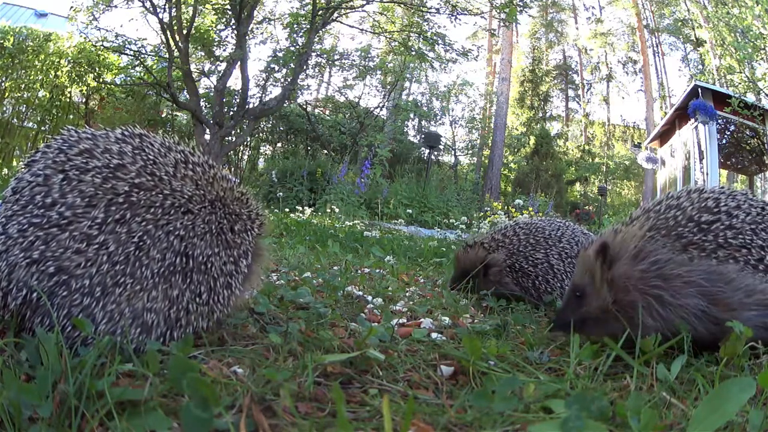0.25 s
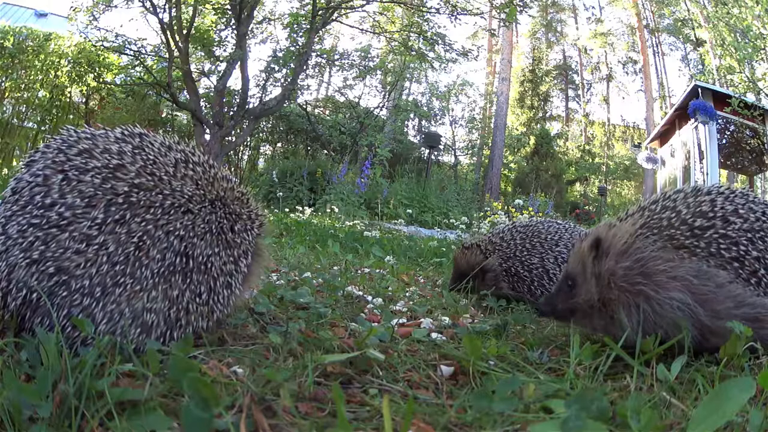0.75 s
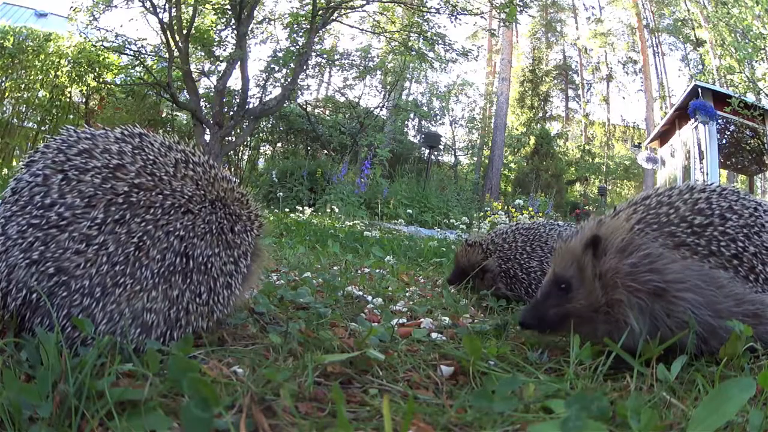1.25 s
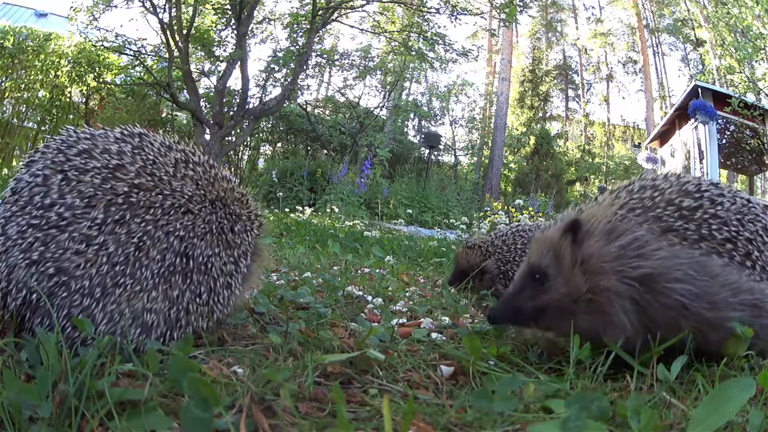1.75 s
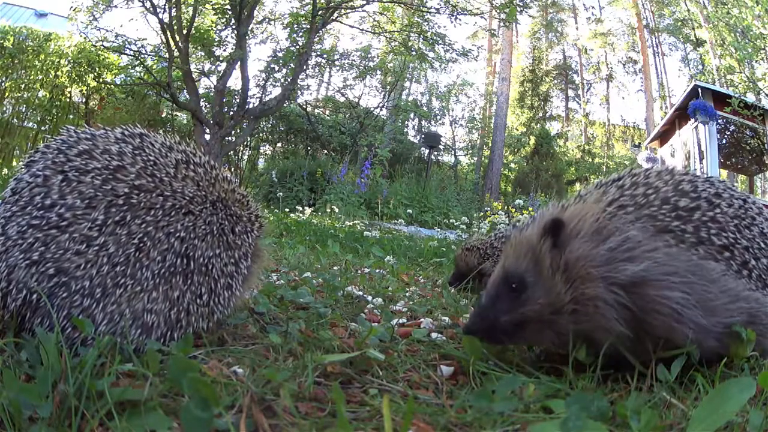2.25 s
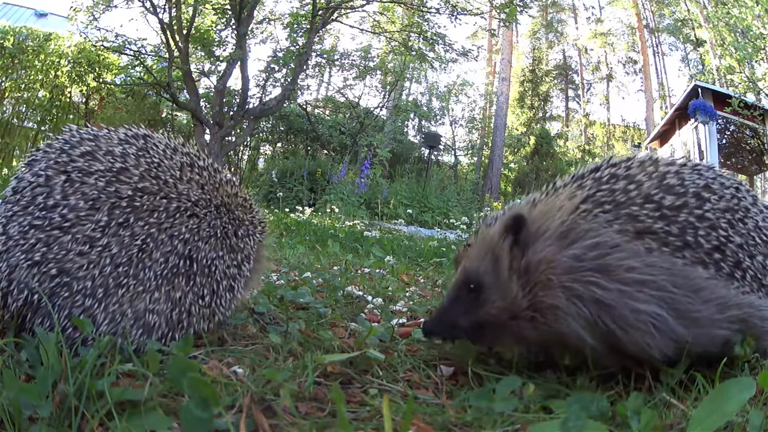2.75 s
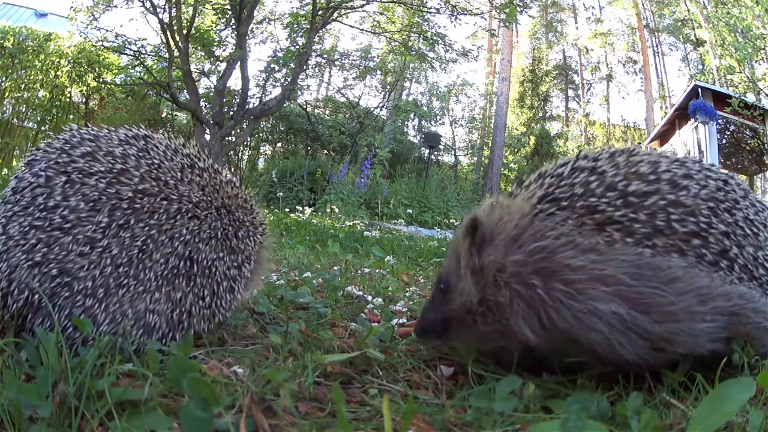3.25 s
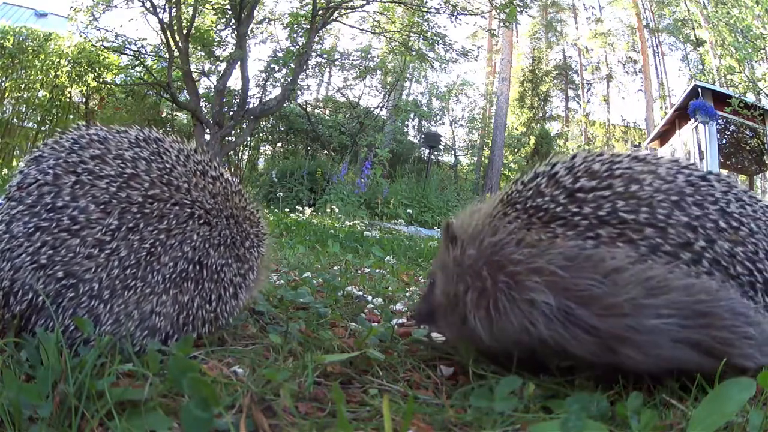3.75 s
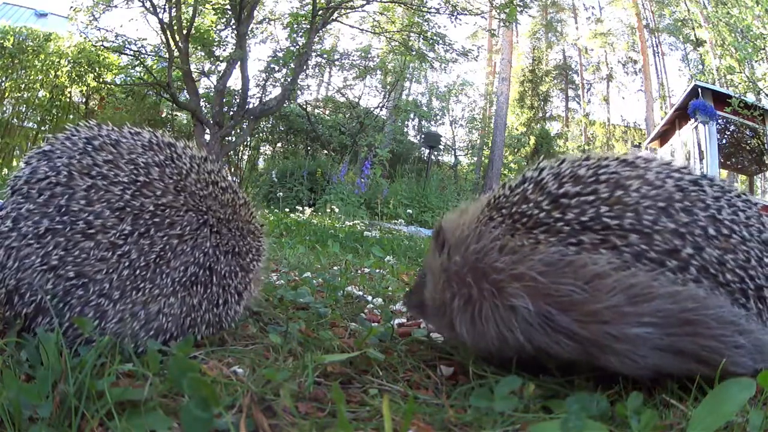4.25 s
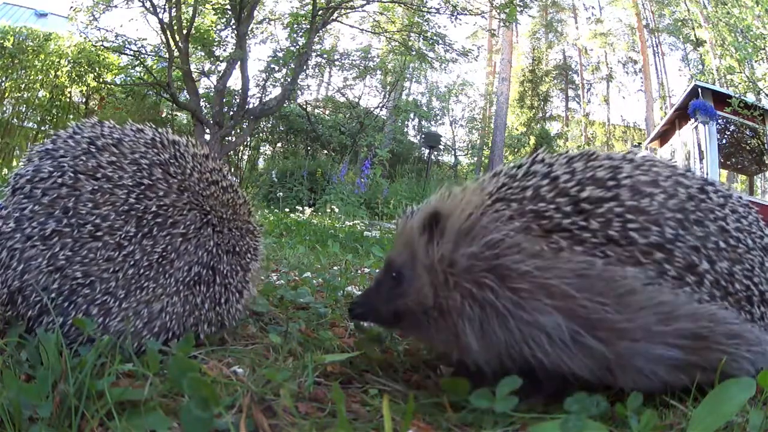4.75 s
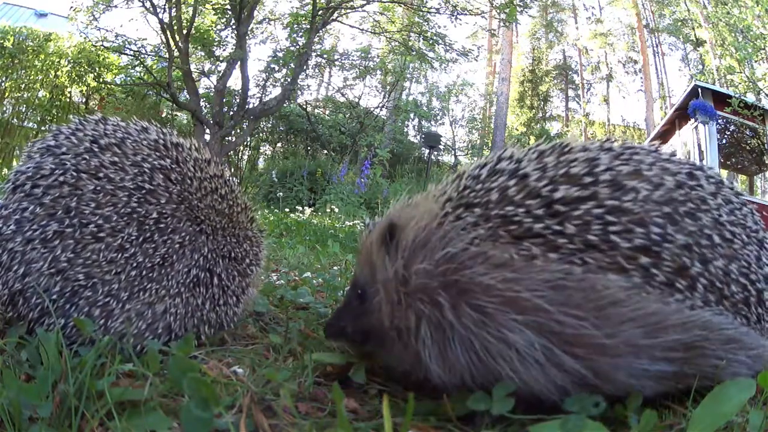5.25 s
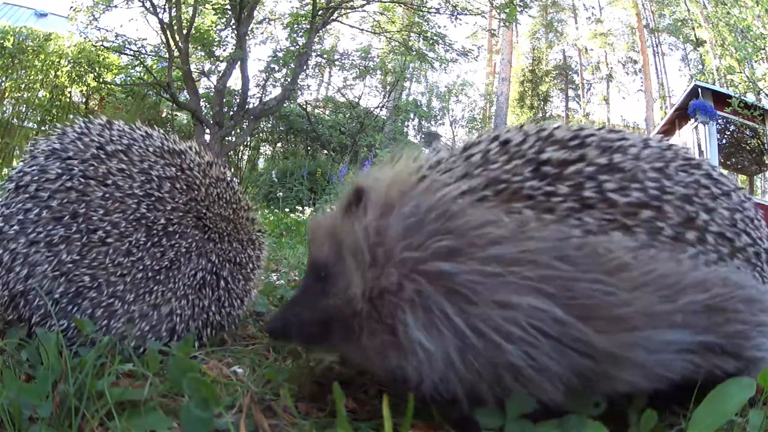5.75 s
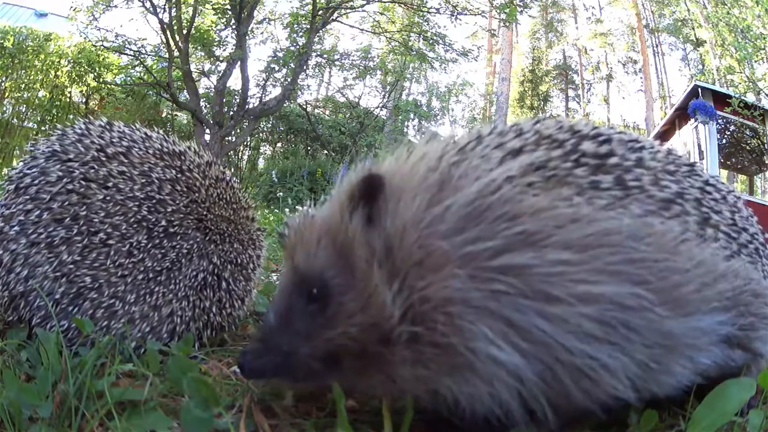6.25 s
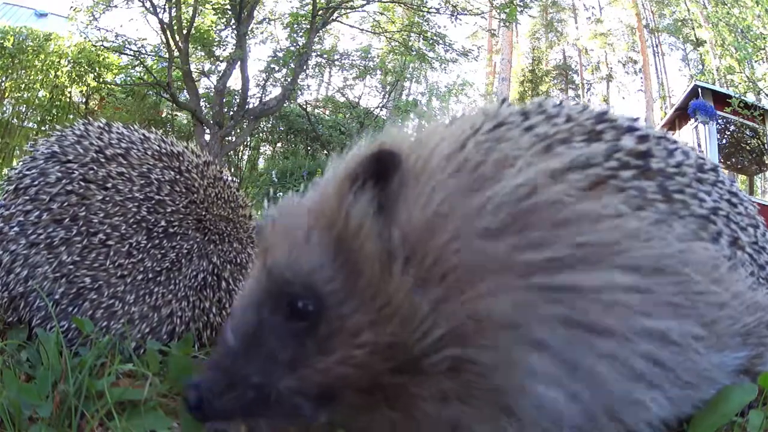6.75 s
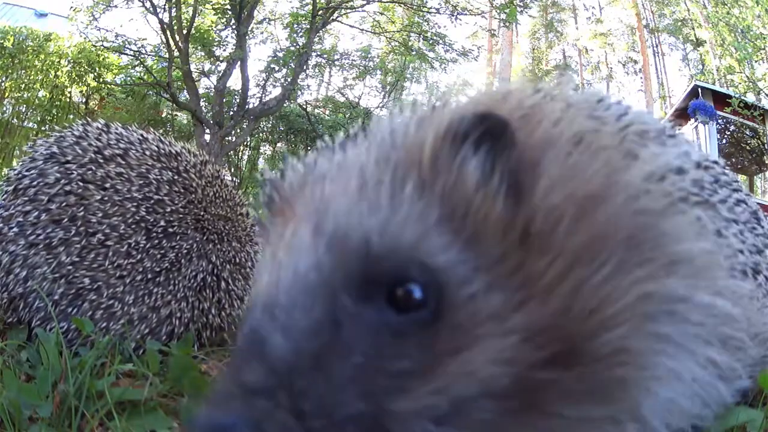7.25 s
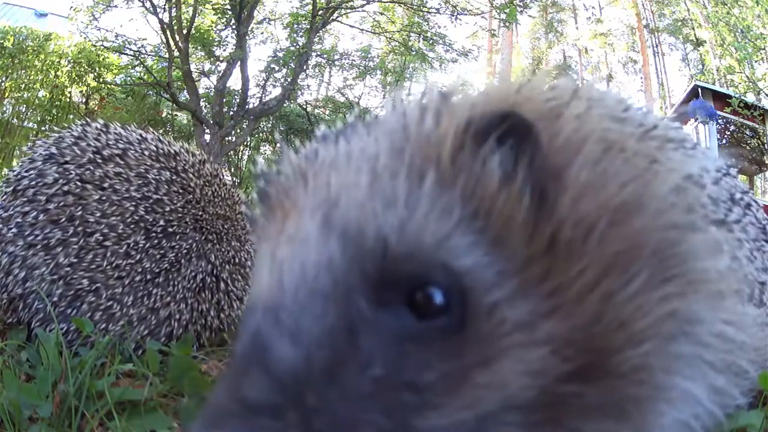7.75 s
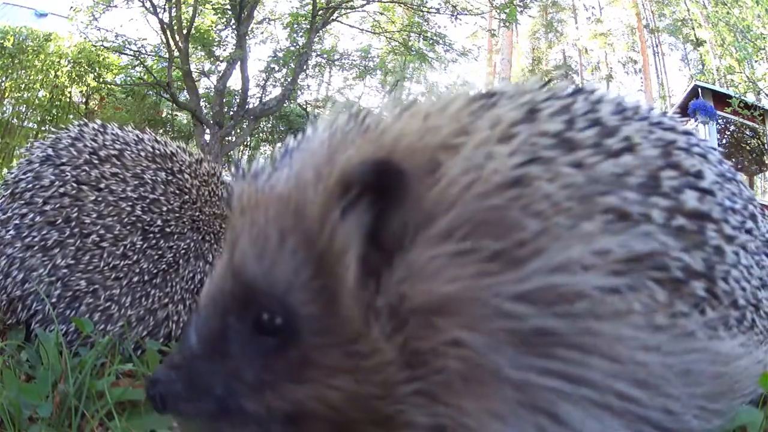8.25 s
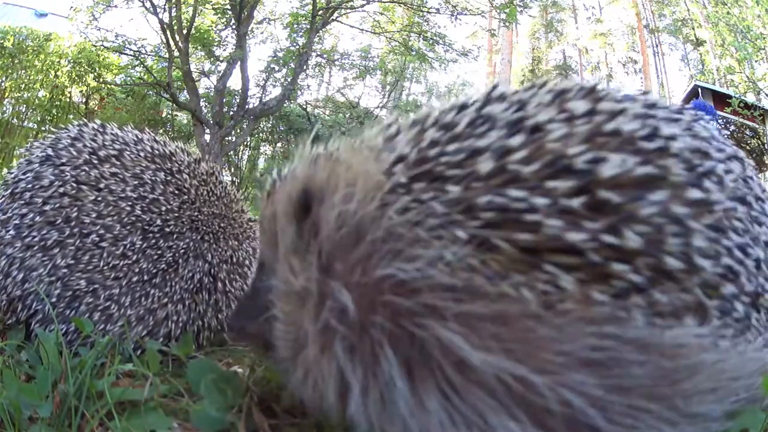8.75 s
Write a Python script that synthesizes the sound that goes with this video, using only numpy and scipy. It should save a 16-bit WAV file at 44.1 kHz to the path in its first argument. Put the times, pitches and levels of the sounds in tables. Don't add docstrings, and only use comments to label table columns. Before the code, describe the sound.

A quiet garden, heard from a stereo microphone lying in the grass, with faint low traffic, a soft engine drone and leaf hiss. From the start a hedgehog snorts steadily, almost three times a second: short, dry, turbulent nose puffs around a tenth of a second, with a hollow nasal ring near 950 Hz. They start modest and slightly right. Footsteps add tiny grit crunches and bright grass ticks, busy around 2.1 to 2.9 seconds, with a sharp snap near 3.4. A tiny hoarse grunt rises at 2.3. From 4 seconds the huffs strengthen; more crackle comes at 5.5 and 6.3. Between 7.1 and 7.9 they are loudest, very close and left, with quick soft sniffs at 7.7 to 8.1, while a distant vehicle passes faintly, nearest around 7.4. After 8.3 the snorts drop somewhat but continue to the end at 9. Occasional thin, high nostril whistles are barely audible.

```python
import sys
import numpy as np
from scipy import signal
from scipy.fft import rfft, irfft, next_fast_len
from scipy.io import wavfile
from scipy.ndimage import uniform_filter1d, map_coordinates

SR = 44100
rng = np.random.default_rng(int(sys.argv[2]) if len(sys.argv) > 2 else 0)


def output_pcm(signal):
    pcm = np.clip(np.atleast_2d(signal).T, -1, 1) * 32767
    wavfile.write(sys.argv[1], SR, np.round(pcm).astype(np.int16))


def rack_gain(trim_db):
    fader = np.asarray(trim_db, float)
    return 10 ** (fader / 20)


N = 396459
T = np.arange(N) / SR

# pitch_hz, density_db
TRAFFIC = [(12, -34), (20, -3.5), (65, -0.5), (289, -5.5), (634, -6), (1000, -7), (1790, -24), (3300, -57)]
# pitch_hz, density_db
LEAVES = [(600, -40), (1790, -22.5), (3330, -26.5), (4050, -27), (7950, -44.5), (14700, -38.5),
          (16500, -67)]
# pitch_hz, correlation
ALIKE = [(25, 0.94), (60, 1), (150, 0.86), (380, 0.74), (950, 0.64), (2380, -0.67), (5500, 0.68),
         (7000, 0.66)]
# pitch_hz, width_hz, level_db
DRONE = (70.6, 8.7, -56)
# time_s, level_db
PASSING = [
    (5.9, -71),
    (6.9, -55),
    (7.3, -50.5),
    (7.65, -51),
    (8.3, -60),
    (8.99, -72),
]
# pitch_hz, width_hz, level_db
TYRES = [(620, 170, 1), (800, 200, -4)]

# start_s, hold_s, high_level_db, low_extra_db
INBREATHS = [(0.233, 0.033, -74, 4.5), (0.526, .04, -73, 5), (.73, .04, -74, 3), (0.927, 0.1, -67, 3),
             (1.377, 0.046, -67, 2.5), (1.737, 0.032, -56.5, 3), (1.92, 0.046, -69, 3.5),
             (2.11, 0.069, -59.5, 2.5), (2.33, 0.046, -72, 7), (2.523, 0.069, -58, 1.5),
             (2.762, 0.054, -65, 2), (3.11, 0.11, -78, -6.5), (3.355, 0.03, -44.5, 5.5),
             (3.572, 0.046, -67, 3), (4.093, 0.022, -66, 4.5), (4.702, 0.023, -56, 2), (5.05, 0.045, -59, 4),
             (5.467, 0.038, -54.5, 5.5), (5.575, 0.12, -62.5, 1), (5.835, 0.033, -66, 0.5),
             (6.114, 0.032, -54.5, 1.5), (6.328, 0.06, -62, -1), (6.497, 0.023, -54, 0.5),
             (6.907, 0.033, -70, 1), (7.62, 0.044, -72, 1), (8.047, 0.014, -59, 9), (8.116, .04, -73, -3),
             (8.474, .04, -65, -1)]
# pitch_hz, density_db
BREATH_LOW_SPECTRUM = [(1000, 7), (1800, 6), (3000, 1.5), (5200, 1), (7500, -12.5), (9000, -46)]
# pitch_hz, density_db
BREATH_HIGH_SPECTRUM = [(6000, -13), (8700, -1.5), (11000, -3), (12200, 2), (15200, 4), (16500, -16)]
# start_s, grit_db, stem_db, blade_db
TICKS = [
    (2.1223, -51, -60, -52),
    (4.7261, -57, -55, -50),
    (4.9182, -48, -47, -51.5),
    (6.1178, -52, -52, -44),
    (7.5988, -44, -60, -66),
    (3.445, -59, -60, -54),
]
# pitch_hz, pitch_spread, t60_s
TICK_BANDS = [(3320, 0.29, 0.0024), (8200, 0.31, 0.0015), (12400, 0.13, 0.0024), (14900, .06, 0.0024)]
# start_s, pitch_hz, peak_db
GRIT = [(0.2413, 4110, -44), (0.2538, 4030, -47), (0.6853, 3940, -49), (0.7035, 4090, -48),
        (0.7377, 2910, -50), (0.94, 2260, -45), (0.961, 2020, -41), (1.0345, 3880, -43),
        (1.0462, 3120, -48), (1.1837, 2650, -51), (1.3879, 4090, -42), (1.3897, 3960, -49),
        (1.4366, 4610, -51), (1.7287, 3700, -47), (1.783, 3120, -45), (2.2118, 3730, -40.5),
        (2.3268, 4050, -40.5), (2.336, 2800, -39), (2.6788, 3170, -46), (2.7591, 2430, -46),
        (2.7683, 2690, -48), (2.7785, 2930, -46), (2.7848, 3250, -45), (2.7977, 2540, -42),
        (2.7995, 2480, -43), (2.806, 2540, -43), (2.8216, 2560, -35.5), (2.8541, 2480, -49),
        (3.1078, 2890, -51), (3.1322, 3940, -48), (3.1759, 2130, -51), (3.1824, 2520, -47),
        (3.4006, 2260, -38), (3.5326, 3920, -49), (3.5907, 3830, -42), (4.7323, 2150, -46),
        (5.207, 2170, -52), (5.471, 5470, -42), (5.9406, 3680, -40), (6.2995, 2560, -45),
        (6.3128, 2710, -45), (6.315, 2630, -38), (6.3175, 2630, -39.5), (6.3412, 3290, -47),
        (6.3492, 2280, -48), (6.3624, 3900, -42), (6.3656, 3850, -35), (6.3691, 4290, -34),
        (6.3761, 2500, -37), (6.3871, 2390, -44), (6.5821, 3490, -46), (6.6031, 3680, -44),
        (6.7203, 3880, -49), (7.0311, 3660, -45), (7.5986, 4670, -42), (8.5362, 3470, -52),
        (8.8013, 3490, -45), (8.8046, 3700, -35.5), (8.8078, 3450, -41), (8.8108, 3470, -46)]
# start_s, pitch_hz, tip_peak_db, stem_peak_db
BLADES = [(0.2413, 11300, -50, -62), (0.5212, 12200, -49, -60), (0.5234, 11800, -46, -61),
          (0.7469, 14900, -48, -65), (0.9774, 14900, -46, -70), (0.9894, 11400, -48, -55),
          (1.1223, 11600, -49, -63), (1.1837, 12700, -44, -69), (1.384, 14900, -47, -67),
          (1.5566, 14300, -46, -64), (1.9212, 12800, -45, -56), (1.9404, 15000, -51, -71),
          (2.1532, 14600, -41, -62), (2.3133, 12500, -47, -70), (2.3266, 15400, -39, -63),
          (2.3358, 15300, -40, -54), (2.355, 15300, -46, -64), (2.677, 12600, -50, -64),
          (2.6788, 12300, -44, -42), (2.7733, 13000, -50, -72), (2.778, 12600, -40, -63),
          (2.7995, 12100, -38, -44), (2.8541, 12600, -39, -44), (2.8569, 12900, -33, -57),
          (3.1188, 14800, -45, -53), (3.2193, 15100, -50.5, -71), (3.3782, 15000, -25, -40),
          (3.5014, 14700, -41, -61), (3.5326, 13600, -48, -52), (3.582, 12000, -45, -63),
          (3.5907, 15500, -33, -51), (3.9534, 15300, -45, -61), (4.5241, 12800, -50, -63),
          (4.7802, 15100, -50, -62), (4.9015, 15100, -52, -68), (4.9104, 15200, -33, -54),
          (5.1871, 12400, -48, -61), (5.4707, 13900, -37, -36), (6.2993, 11100, -35, -44),
          (6.3175, 11000, -29.5, -46), (6.3369, 14400, -43.5, -55), (6.3412, 12800, -44, -50),
          (6.3489, 11800, -46, -60), (6.3572, 13000, -45, -57), (6.3649, 15100, -37, -52),
          (6.3691, 12200, -37, -52), (6.3821, 15200, -42, -54), (6.6413, 15200, -48, -54),
          (7.5986, 15300, -48, -45), (8.4579, 12200, -43, -51), (.028, 11600, -53, -66),
          (.334, 14600, -52, -60), (5.442, 14500, -43, -62), (5.662, 12500, -50, -50),
          (5.824, 11000, -54, -52)]

# start_s, length_s, nose_db, turned_to_microphone_db
SNORTS = [(0.064, 0.099, -35.5, 1.5), (0.376, 0.12, -36, 0), (0.775, 0.1, -34.5, -0.5),
          (1.222, 0.11, -35, 0), (1.576, 0.098, -32.5, 1), (1.977, 0.12, -33, 4.5),
          (2.388, 0.079, -34, 5.5), (2.915, 0.095, -33, 1), (3.269, 0.072, -34, -1.5),
          (3.64, 0.089, -35, -2.5), (3.966, 0.081, -30, -1.5), (4.271, 0.12, -30, -3.5),
          (4.602, 0.1, -30, 0.5), (4.932, 0.1, -29, 3), (5.315, 0.12, -27, -1), (5.685, .11, -27, -3.5),
          (5.992, 0.087, -27, 1.5), (6.412, 0.081, -28, 3), (6.783, 0.062, -25.5, -1),
          (7.135, 0.066, -20, 1.5), (7.424, 0.11, -20.5, 1.5), (7.865, 0.087, -20.5, 0.2),
          (8.338, 0.073, -27.5, -1.5), (8.612, 0.084, -27, 0), (8.937, 0.065, -26, -3)]
# lung_peak_share_of_length, burst_db, release_db, whisker_db, second_dip_hz
MANNER = [(0.4, -3, 1.5, -10, 2600), (0.4, -0.5, -1, 3, 3000), (0.35, -2, 0.5, 1, 3140),
          (0.44, -0.5, 0, 4, 3000), (0.41, 0, -2, 3, 2900), (0.51, -1, -2, 0, 3100),
          (0.68, -1, 1.5, 0, 3600), (0.34, 0.5, 2.5, 2, 2400), (0.16, 3, 2.5, -0.5, 2500),
          (0.33, -0.5, 2.5, -12, 2600), (0.43, -2, 1.5, -13, 2700), (0.66, 2, -1.5, 0, 2800),
          (0.47, 1, -3.5, 3, 2640), (0.43, -0.5, -1, 1.5, 2580), (0.34, -2.5, -2.5, 0, 2640),
          (0.24, -1, 0, 0, 2610), (0.34, 1, 1, 1.5, 2240), (0.36, 2, -1, 0.5, 2700),
          (0.52, 2, 4.5, 3, 2600), (0.36, -1, 2, 0.5, 2800), (0.49, -1.5, 3, 0.5, 2900),
          (0.33, 1.5, -3.5, 1.5, 3000), (0.4, 0, 1.5, 3, 2600), (0.4, -1, -1, 3, 2530),
          (0.31, -1, 5, -0.5, 2720)]
# pitch_hz, level_db, shoulder_db
NOSTRIL = [(990, 6, -14), (995, 4, -17), (990, 5, -16), (970, 9, -14), (900, 3.5, -17), (960, 7.5, -12),
           (910, 0, -10), (850, 6, -27), (915, 3, -8), (910, 11, 5), (980, 7, -8), (1010, 7, -12),
           (1010, 6, -14), (960, 4.5, -10), (990, 4.5, -2), (900, 6.5, -12), (910, 2.5, -19), (910, 2, -17),
           (1010, 0.5, -24), (900, 0.5, 0), (980, 2.5, -8), (970, 2.5, -7), (930, 1.5, -2), (860, 4, -2),
           (930, -3, -10)]
# pitch_hz, width_hz
SHOULDER = (1110, 96)
# pitch_hz, width_hz, level_db
NOSE = [(299, 162, 3), (655, 670, -1.5)]
# pitch_hz, width_hz, level_db
UPPER = [
    [(1970, 760, 0)],
    [(3465, 1270, 0.5), (4170, 790, 1.5)],
    [(5960, 2500, 0)],
    [(8580, 2800, 0)],
    [(12640, 3000, 6.5), (15300, 2200, 2)],
]
STEEP = [0.86, 1.49, 1.75, 1.84, 1.54]
# usual_db, per_db_nearer, extra_per_db_inside_usual, per_db_turned
PARTS = [(-8.5, -0.19, 0.7934, 0.77), (-21, 0.65, 0.73, 0.5), (-17, 0.32, -0.27, 0.5),
         (-15.5, -0.05, 0.12, 1.3)]
# time_s, first_dip_hz, first_depth_0_1, second_depth_0_1, sinus_over_nose_db
HEAD = [(.1, 1970, 0, 0.35, -21), (.43, 1950, 0.1, 0.55, -15), (.82, 2000, 0.6, 0.35, -15.5),
        (1.27, 1900, 0.7, 0.15, -14), (1.6, 1870, 0.7, 0.1, -19), (2.03, 1890, 0.6, 0.3, -20),
        (2.43, 1860, 1, .02, -8), (2.95, 1800, 0.04, 0.2, -17), (3.3, 1750, 0.14, 0.2, -15),
        (3.68, 1700, 0.46, 0.44, -6), (4.0, 1600, 0.38, 0.4, -7), (4.3, 1570, 0.38, 0.6, -11),
        (4.64, 1570, 0.17, 0.95, -12.5), (4.97, 1570, 0.16, .8, -13.5), (5.36, 1560, 0.46, 0.8, -11),
        (5.75, 1640, 0.2, 1, -14), (6.02, 1690, 0.2, 0.66, -15), (6.44, 1920, 0.9, 0, -12),
        (6.8, 1800, 0.86, 0.07, -13), (7.15, 1570, 0.8, 0.2, -11), (7.5, 1550, 1, 0.1, -8),
        (7.9, 1680, 0.9, 0.3, -11.5), (8.4, 1870, 0.25, 0.2, -27), (8.64, 1400, 0, 0.7, -10.5),
        (8.97, 1540, 0.04, 0.8, -10.5)]
# pitch_hz, width_hz, depth_0_1
BRANCHES = [(7100, 1780, 0.67), (10300, 1200, 0.14)]
# time_s, left_minus_right_db
PLACE = [(0.0, -3), (2.9, 1), (4.46, 0.5), (6.86, 4.5), (7.49, 4.5), (7.99, 5.5), (8.99, 3)]
# pitch_hz, share_of_level_difference, louder_side_lag_per_share
SIDEWAYS = [(250, .03, 0.2), (450, 0.26, 0.36), (905, 1.0, 0.33), (2000, .95, 1.15), (4000, 0.92, 0.5),
            (8000, 0.94, .02), (13000, 0.83, .02)]
# pitch_hz, level_db
SCATTER = [(900, -19), (2100, 5.5), (4000, -4), (8500, -20), (13000, 1.5)]

# start_s, length_s, start_hz, end_hz, level_db
WHISTLES = [(.585, .045, 10400, 9400, -76), (1.41, .07, 15000, 13700, -70), (1.76, .04, 15000, 14700, -61),
            (2.217, .035, 15000, 13200, -66), (2.259, .013, 9400, 8700, -72),
            (8.06, .05, 15500, 14600, -63), (3.425, .015, 8800, 8360, -55), (3.823, .03, 10600, 9700, -70)]
# time_s, pitch_hz, level_db
GRUNT = [
    (2.255, 174, -71),
    (2.278, 188.3, -51),
    (2.3, 211.7, -46.5),
    (2.318, 247.5, -51),
    (2.34, 260.4, -47),
    (2.362, 250, -51),
    (2.38, 243, -53),
]
# pitch_hz, level_db
THROAT = [(150, 14), (300, -12), (650, 6), (880, 0), (1100, -23), (1500, -7), (2200, -49)]
# start_s, hold_s, level_db
SNIFFS = [
    (7.665, 0.022, -45.5),
    (7.745, 0.029, -41.5),
    (7.825, 0.043, -40.5),
    (8.005, 0.028, -40.5),
    (8.085, 0.032, -54),
    (8.14, 0.022, -60),
]
# pitch_hz, width_hz, level_per_pass_db
SNIFF_NOSE = [(700, 1400, 0), (2200, 790, 2), (5400, 1200, -5.5), (8800, 1400, -10.5), (12500, 4000, -14)]
# pitch_hz, width_hz, depth_0_1
HOUSING = [(7400, 570, 0.33), (9960, 1260, 0.23), (14300, 900, 0.34)]

LAND_DB_PER_S, SETTLE_DB_PER_S = 200, 182
HIGH_STILL_DB, LOW_STILL_DB, LOW_GROW = -73, -64, 0.44
GRIT_T60_S, TIP_T60_S, STEM_T60_S, STEM_HZ = 0.0032, 0.0019, 0.0015, 8500
TIP_PAIR_HZ, PAIR_DB = 27200, -4.5
USUAL_DB = -30
BURST_S, RELEASE_S, SLOWER_PER_DB = 0.0105, 0.02, 0.03
SHUT_DB, OPEN_DB, SPENT_DB, STOP_DB = -17, -4, -5.5, -17
RING_WIDTH_HZ = 260
EDGE_HZ, EDGE_WIDTH_HZ = 5000, 780
EDGE_DEPTH, EDGE_PER_DB, EDGE_MOST = 0.33, 1, 0.7
SAG, SAG_SPREAD = 0.022, 0.031
JET_SIDE_DB_PER_DB = 0.2
HISS_SINK, HISS_WIDENS_DB = 0.006, 0.2
POP_DB, POP_DB_PER_DB, POP_S = -17.5, 0.4, 0.0024
SCATTER_T60_S = 0.03
DRAW_DB_PER_S, EASE_DB_PER_S = 750, 378
TOP_HZ, BOTTOM_HZ = 15720, 14
CEILING = 0.8


def unit(x):
    return x / np.sqrt(np.mean(x ** 2) + 1e-20)


def along(points, hz):
    f, v = np.transpose(points)
    return np.interp(np.log(hz + 1), np.log(f + 1), v)


def level(rows):
    time_s, db = np.transpose(rows)
    return np.interp(T, time_s, db, left=-140, right=-140)


def wobble(rate_hz, size=N):
    knots = rng.standard_normal(int(size * rate_hz / SR) + 4)
    return map_coordinates(knots, [np.arange(size) * rate_hz / SR])


def swells(rows, rise, fall):
    t = T[::32]
    curves = [db - rise * np.clip(s - t, 0, None) - fall * np.clip(t - s - hold, 0, None)
              for s, hold, db in rows]
    return np.interp(T, t, np.max(curves, axis=0))


def filtered(x, response):
    m = next_fast_len(x.shape[-1] + SR // 20)
    return irfft(rfft(x, m) * response(np.fft.rfftfreq(m, 1 / SR)), m)[..., :x.shape[-1]]


def shade(spectrum):
    return lambda hz: rack_gain(along(spectrum, hz))


def tube(modes):
    return lambda f: sum(rack_gain(db) * 1j * f * w / (c * c - f * f + 1j * f * w) for c, w, db in modes)


def steep(modes):
    return lambda f: np.sqrt(sum(np.abs(tube([mode])(f)) ** 4 for mode in modes))


def notch(hz, width_hz, depth):
    return lambda f: 1 - np.clip(depth, 0, 1) * tube([(hz, width_hz, 0)])(f)


def notches(dips):
    return lambda f: np.prod([notch(*dip)(f) for dip in dips], axis=0)


def drifting(x, response, sag):
    late = np.linspace(0, 1, len(x))
    high = filtered(x, lambda f: response(f / (1 + sag)))
    low = filtered(x, lambda f: response(f / (1 - sag)))
    return (1 - late) * high + late * low


def rush(response, alike, patchy_db):
    z = signal.stft(rng.standard_normal((2, N + SR // 10)), nperseg=512)[2]
    field = uniform_filter1d(rng.standard_normal(z.shape[1:]), size=6, axis=0)
    field = uniform_filter1d(field, size=12, axis=1)
    pair = signal.istft(z * rack_gain(patchy_db * unit(field)), nperseg=512)[1][:, :N]
    turn = lambda hz: np.arccos(np.clip(along(alike, hz), -1, 1)) / 2
    mid, side = filtered(pair, lambda hz: response(hz) * [np.cos(turn(hz)), np.sin(turn(hz))])
    return unit(np.array([mid + side, mid - side]))


def garden():
    hz, width_hz, db = DRONE
    swell = rack_gain(0.5 * wobble(1.2) + 0.5 * wobble(7))
    both = lambda f: np.hypot(shade(TRAFFIC)(f), shade(LEAVES)(f))
    hum = rack_gain(-47.0) * swell * rush(both, ALIKE, patchy_db=0.78)
    engine = unit(filtered(rng.standard_normal(N), tube([(hz, width_hz, 0)])))
    return hum + rack_gain(db + 1.6 * wobble(2.55)) * engine


def inbreaths():
    tips = swells([row[:3] for row in INBREATHS], LAND_DB_PER_S, SETTLE_DB_PER_S)
    rows = [(s, hold, LOW_STILL_DB + LOW_GROW * (db - HIGH_STILL_DB) + extra_db)
            for s, hold, db, extra_db in INBREATHS]
    stems = swells(rows, LOW_GROW * LAND_DB_PER_S, LOW_GROW * SETTLE_DB_PER_S)
    return np.maximum(tips, HIGH_STILL_DB), np.maximum(stems, LOW_STILL_DB)


def breath_hiss(high_db, low_db):
    over = lambda db, floor_db: np.sqrt(np.clip(rack_gain(2 * db) - rack_gain(2 * floor_db), 0, None))
    grain = rack_gain(1.5 * wobble(40) + 3.5 * wobble(250))
    low = over(low_db, -67.5) * rush(shade(BREATH_LOW_SPECTRUM), [(3000, 0.8)], patchy_db=0.4)
    high = over(high_db, -80) * unit(filtered(rng.standard_normal(N), shade(BREATH_HIGH_SPECTRUM)))
    return (low + high) * grain * rack_gain(-4.0)


def ticks(high_db, count=440):
    faint = rng.random((count, 4))
    start_s = faint[:, 0] * N / SR
    faint = np.c_[start_s, -60 - 14 * faint[:, 1], -63 - 14 * faint[:, 2], -63 - 13 * faint[:, 3]]
    faint[:, 1:] += 0.29 * (np.interp(faint[:, :1], T, high_db) + 75)
    out, t = np.zeros((2, N + SR)), np.arange(SR // 200) / SR
    onset = 1 - np.exp(-t / 0.0001)
    for s, grit_db, stem_db, blade_db in [*TICKS, *faint]:
        chance = rng.standard_normal((2, 4))
        snap = np.zeros(len(t))
        levels_db = [grit_db, stem_db, blade_db - 1.5, blade_db - 4]
        for db, (hz, spread, t60_s), c in zip(levels_db, TICK_BANDS, chance[0]):
            ring = np.sin(2 * np.pi * hz * np.exp(spread * c / 2) * t)
            snap += rack_gain(db + 14.5 - 60 * t / t60_s) * ring * onset
        i = round(s * SR)
        out[:, i:i + len(t)] += snap * rack_gain(0.82 * chance[1, 0] * np.array([[1], [-1]]))
    return out[:, :N]


def crunches():
    out, t = np.zeros((2, N)), np.arange(SR // 200) / SR
    onset = 1 - np.exp(-t / 0.00015)
    ring = lambda hz, db, t60_s: rack_gain(db - 60 * t / t60_s) * np.sin(2 * np.pi * hz * t) * onset
    snaps = []
    for (s, hz, db), (c, d) in zip(GRIT, rng.standard_normal((len(GRIT), 2))):
        grain = ring(hz, db + 4.5, GRIT_T60_S * rack_gain(2.5 * c))
        snaps.append((s, grain + ring(hz * np.exp(0.15 * d), db - 0.5, GRIT_T60_S)))
    for s, hz, db, stem_db in BLADES:
        tip = ring(hz, db + 8.0, TIP_T60_S) + ring(TIP_PAIR_HZ - hz, db + 8.0 + PAIR_DB, TIP_T60_S)
        snaps.append((s, tip + ring(STEM_HZ, stem_db + 10.5, STEM_T60_S)))
    for (s, snap), lean in zip(snaps, rng.standard_normal(len(snaps))):
        i = round(s * SR)
        out[:, i:i + len(t)] += snap * rack_gain(1.5 * lean * np.array([[1], [-1]]))
    return out


def airway(nearer_db):
    sinus, (core, jet_side), whisker, edge, (hiss, *rest) = UPPER
    jet_side = np.add(jet_side, (0, 0, JET_SIDE_DB_PER_DB * min(nearer_db, 0)))
    hz, width_hz, db = hiss
    hiss = (hz * (1 - HISS_SINK * nearer_db), width_hz * rack_gain(HISS_WIDENS_DB * nearer_db), db)
    return [sinus, [core, jet_side], whisker, edge, [hiss, *rest]]


def snort(blow, manner, nostril):
    start_s, length_s, nose_db, turned_db = blow
    peak, early_db, late_db, whisker_db, second_hz = manner
    ring_hz, ring_db, shoulder_db = nostril
    nearer_db, sag = nose_db - USUAL_DB, SAG + SAG_SPREAD * rng.standard_normal()
    burst_s = BURST_S * np.exp(-SLOWER_PER_DB * nearer_db)
    peak_s = np.clip(peak, 0.1, 0.9) * length_s
    s = start_s + np.array([-burst_s, 0, peak_s, length_s, length_s + RELEASE_S])
    at_s, *head = np.transpose(HEAD)
    dip_hz, depth, second, sinus_db = [np.interp(s[2], at_s, c) for c in head]
    parts_db = [sinus_db]
    for db, near, close, turn in PARTS:
        parts_db.append(db + near * nearer_db + close * max(nearer_db, 0) + turn * turned_db)
    parts_db[2] += whisker_db

    t = np.arange(s[0] - 0.012, s[-1] + 0.015, 1 / SR)
    opening = np.clip((t - s[0]) / burst_s, 0, 1) ** 0.082
    knots_s = [s[0] - 0.004, *s, t[-1]]
    knots_db = [SHUT_DB, OPEN_DB + early_db, 0, SPENT_DB + late_db, STOP_DB + late_db]
    pressure = lambda lag_s: opening * np.interp(t - lag_s, knots_s, [0, *rack_gain(knots_db), 0])
    flow = pressure(0)

    air = rng.standard_normal(len(t)) * rack_gain(1.12 * wobble(110.4, size=len(t)))
    cavity = tube([*NOSE, (ring_hz, RING_WIDTH_HZ, ring_db), (*SHOULDER, shoulder_db)])
    dark = tube([(650, 1500, 0)])
    puff = unit(filtered(air, lambda f: cavity(f) * dark(f) ** 2))
    puff = puff * pressure(0.0011)
    for modes, part_db, power in zip(airway(nearer_db), parts_db, STEEP):
        flutter_db = 1.25 * wobble(35, size=len(t)) + 0.48 * wobble(196, size=len(t))
        eddies = rng.standard_normal(len(t)) * rack_gain(flutter_db)
        puff += unit(drifting(eddies, steep(modes), sag)) * rack_gain(part_db) * flow ** power
    puff += 0.047 * puff ** 2 / (flow + 0.11)
    edge_depth = min(EDGE_DEPTH - EDGE_PER_DB * whisker_db, EDGE_MOST)
    dips = [(dip_hz, 620, depth), (second_hz, 650, second + 0.075),
            (EDGE_HZ, EDGE_WIDTH_HZ, edge_depth), *BRANCHES]
    puff = drifting(puff, notches(dips), sag)
    u = (t - s[0]) / POP_S
    puff += rack_gain(POP_DB + POP_DB_PER_DB * nearer_db) * (1 - u * u) * np.exp(-u * u / 2)
    return round(t[0] * SR), rack_gain(nose_db + 1.87) * puff


def snorts():
    out = np.zeros(N + SR)
    for blow, manner, nostril in zip(SNORTS, MANNER, NOSTRIL):
        i, puff = snort(blow, manner, nostril)
        out[i:][:len(puff)] += puff
    return out[:N]


def placed(x):
    hz, share, lag = np.transpose(SIDEWAYS)
    lean = lambda f: along(np.c_[hz, share], f) - 1j * along(np.c_[hz, lag], f)
    t = np.arange(SR // 50) / SR
    tail = rng.standard_normal(len(t)) * rack_gain(-60 * t / SCATTER_T60_S)
    scattered = signal.oaconvolve(x, tail / np.linalg.norm(tail))[:N]
    scattered = filtered(scattered, shade(SCATTER))
    side = np.tanh(level(PLACE) * np.log(10) / 40) * (filtered(x, lean) + scattered)
    return np.array([x + side, x - side])


def lawn(x):
    t = np.arange(SR // 8) / SR
    tail = rng.standard_normal((2, len(t))) * rack_gain(-60 * t / 0.16)
    tail = filtered(tail, lambda f: 1 / (1 + (f / 5500) ** 4))
    return signal.oaconvolve(x[None], tail / np.linalg.norm(tail[0]), axes=1)[:, :N]


def whistles():
    out = np.zeros(N)
    for s, length_s, start_hz, end_hz, db in WHISTLES:
        u = np.linspace(0, 1, int(length_s * SR))
        hz = start_hz + (end_hz - start_hz) * u + 3000 * length_s * wobble(50, size=len(u))
        swell = np.abs(np.sin(np.pi * u)) ** 0.5
        out[round(s * SR):][:len(u)] = rack_gain(db) * swell * np.sin(2 * np.pi * np.cumsum(hz) / SR)
    return out


def grunt():
    s, pitch_hz, db = np.transpose(GRUNT)
    out, t = np.zeros(N), np.arange(s[0], s[-1], 1 / SR)
    hz = np.interp(t, s, pitch_hz) * (1 + 0.018 * wobble(122, size=len(t)))
    turn = 2 * np.pi * np.cumsum(hz) / SR
    voice = np.zeros(len(t))
    for k in range(1, 9):
        voice += rack_gain(along(THROAT, k * hz) + 3 * wobble(55, size=len(t))) * np.sin(k * turn)
    out[round(s[0] * SR):][:len(t)] = voice * rack_gain(np.interp(t, s, db) + 0.5)
    return out


def passing():
    return rack_gain(level(PASSING) + 2.5 * wobble(9)) * rush(steep(TYRES), ALIKE, patchy_db=-3.0)


def sniffs():
    air = unit(filtered(rng.standard_normal(N), steep(SNIFF_NOSE)))
    return air * rack_gain(swells(SNIFFS, DRAW_DB_PER_S, EASE_DB_PER_S) - 2.5)


def scene():
    nose = snorts() + sniffs() + whistles()
    high_db, low_db = inbreaths()
    clicks = ticks(high_db) + crunches()
    mix = placed(nose) + rack_gain(-36.5) * lawn(nose) + grunt()
    mix = mix + breath_hiss(high_db, low_db) + garden() + passing() + clicks
    top = lambda hz: 1 / (1 + np.exp(np.clip((hz - TOP_HZ) / 30, -50, 50)))
    band = lambda hz: notches(HOUSING)(hz) * top(hz) * 1j * hz / (BOTTOM_HZ + 1j * hz)
    loud = clicks.mean(0) * (uniform_filter1d(np.abs(clicks[0]), size=60) > rack_gain(-45))
    return filtered(mix, band) + filtered(loud, lambda hz: (1 - top(hz)) * (hz < 16650))


def roll_off(x):
    return signal.sosfilt(signal.butter(12, 16660, fs=SR, output="sos"), x)


def record(dry):
    mix = dry / (1 + np.abs(dry / CEILING) ** 3) ** (1 / 3)
    return roll_off(mix)


dry = scene()
out = record(dry)
output_pcm(out)
```